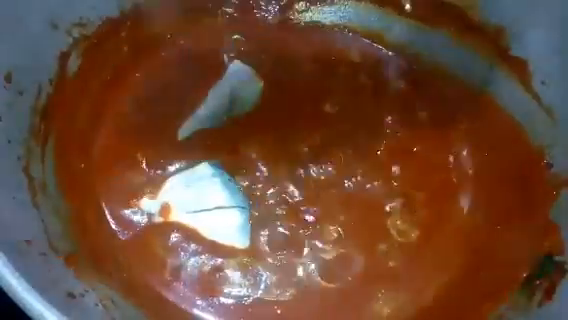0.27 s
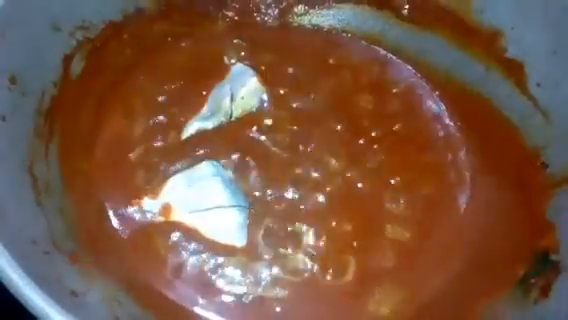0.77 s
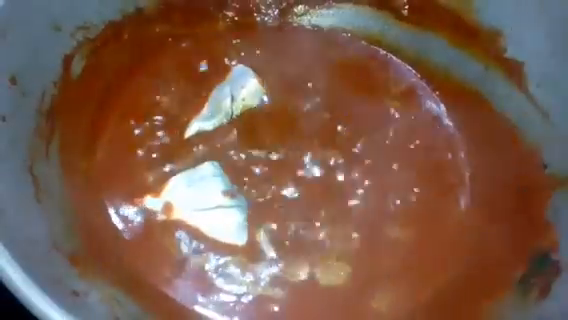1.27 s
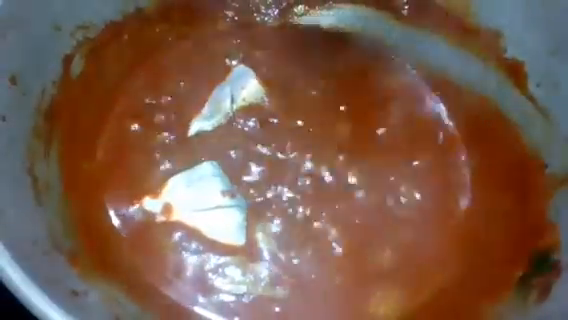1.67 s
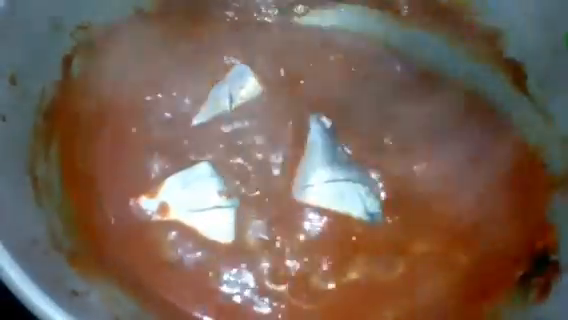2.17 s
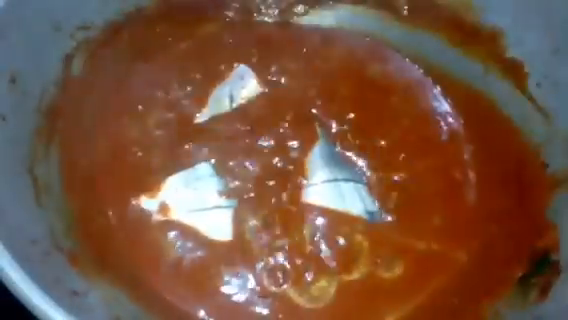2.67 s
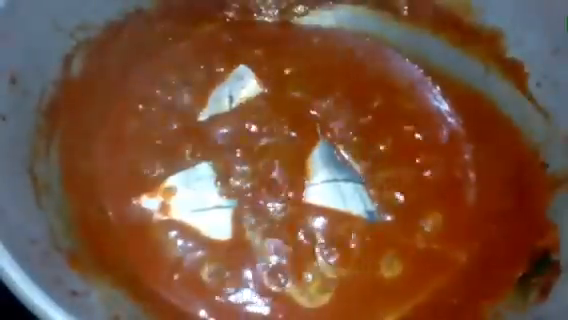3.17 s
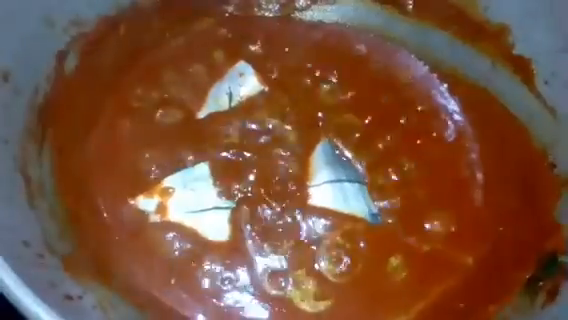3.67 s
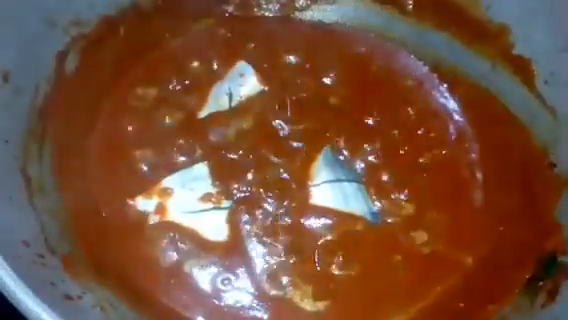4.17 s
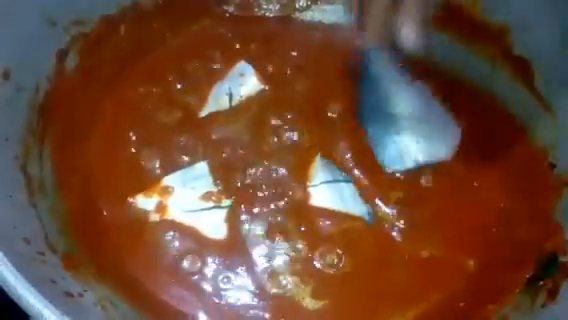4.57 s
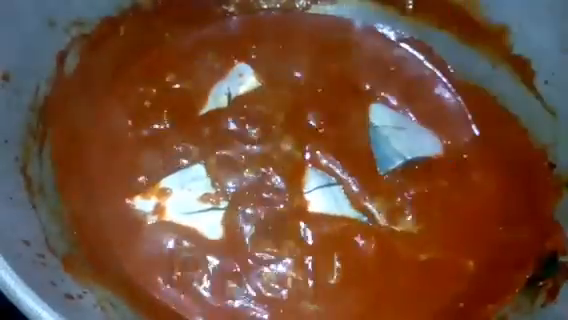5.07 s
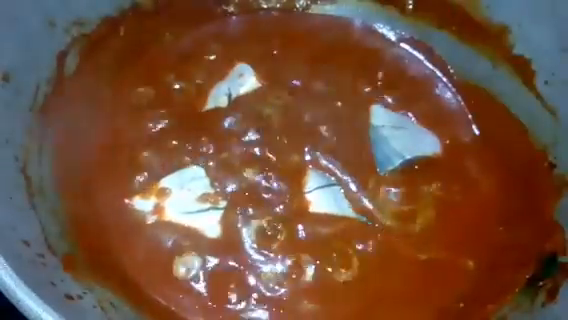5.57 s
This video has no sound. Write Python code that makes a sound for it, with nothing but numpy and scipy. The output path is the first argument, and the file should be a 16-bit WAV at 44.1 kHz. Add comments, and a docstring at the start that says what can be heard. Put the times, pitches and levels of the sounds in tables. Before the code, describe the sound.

Thick gravy simmers in a metal pan, heard very close in a small kitchen. Uneven bubbles tick, pop and glug over a faint burner rush, with one sharp bright pop about a second in. Near the middle, something hollow like a bowl knocks down hard twice beside the stove, rattling briefly. Simmering continues, then a piece of fish slaps softly into the gravy with a gurgle.

```python
"""Thick gravy simmers in a metal pan in a small kitchen, close to the microphone: bubbles of every size
are sines that swell, climb in pitch and die as the film tears, with noise snaps and short reflections.
The pan booms softly as noise excites its resonances, over the noise rush of a burner.
Something hollow, perhaps a bowl, knocks down twice beside the stove (clicks into ringing modes, and clatter)
and is slid along (friction noise); then a piece of fish slaps into the gravy (noise and a spray of bubbles)."""
import sys
import numpy as np
from scipy import signal
from scipy.fft import rfft, irfft
from scipy.io import wavfile
from scipy.ndimage import uniform_filter1d

SR = 44100
rng = np.random.default_rng(int(sys.argv[2]) if len(sys.argv) > 2 else 0)


def persist_wave(psi):
    """Save psi, clipped to +-1, as 16-bit WAV."""
    counts = np.round(np.clip(psi, -1, 1) * 32767).astype(np.int16)
    wavfile.write(sys.argv[1], SR, np.atleast_2d(counts).T)


N = 257103
TIME = np.arange(N) / SR
PORT_LAG_S = 0.00025   # extra travel time to the left microphone port

# level difference between the ports for the pan at large: frequency_hz, left_right_db
SHADE = [(150, -2), (400, -0.5), (700, 1), (1700, -1.5), (3100, -4), (5500, -10.5), (9000, -22),
         (13000, -76)]
# the same for sounds from the right, mostly weaker at the left port: frequency_hz, left_right_db
RIGHT_SHADE = [(150, -9), (330, 1.5), (500, -4), (770, -7), (1170, -9), (1800, -1), (2750, -5.5),
               (4200, -4.5), (6400, -10), (9800, -26), (15000, -33)]
# the simmer; its burble is strongest near 1.85 s, then slowly calms: time_s, fizz_db, burble_db
SIMMER = [(0, -65.5, -63), (1.1, -67.5, -64), (1.85, -64.5, -60.5), (2.6, -66.5, -63), (4.2, -66.5, -65),
          (5.83, -66.5, -67.5)]
# relative loudness of tiny bubbles by size: pitch_hz, level_db
FIZZ = [(1900, -21), (3200, 1.5), (4500, 6.5), (6200, 5.5), (7400, -38)]
# relative loudness of soft larger bubbles by size: pitch_hz, level_db
BURBLE = [(300, -8.5), (530, 4.5), (750, 3), (1200, 6), (2400, 0.5)]
# big bubbles opening: onset_s, level_db, pitch_hz, left_right_db
GLUGS = [(0.135, -34, 658, -0.5), (0.399, -48.5, 493, 1), (0.653, -44, 500, 5), (0.845, -48, 537, 10),
         (1.085, -47.5, 356, 1), (1.164, -45.5, 273, 0), (1.394, -45.5, 343, 2), (1.456, -45, 510, 3),
         (1.539, -50, 507, 3), (1.637, -51.5, 485, 0), (1.684, -52, 537, 2), (1.812, -45.5, 694, 1),
         (1.871, -44.5, 660, 1), (2.056, -45, 268, 0), (2.281, -46.5, 573, -3), (2.627, -43.5, 800, -0.5),
         (2.763, -35.5, 556, -2), (3.403, -45, 524, -3), (3.644, -51, 516, 2), (4.004, -42.5, 620, -3),
         (4.16, -42.5, 590, 4), (4.283, -49.5, 340, -1), (4.857, -32.5, 640, -7), (5.294, -40.5, 580, -3),
         (5.525, -49, 245, 2), (5.751, -46.5, 301, -1)]
# contacts of the hollow thing: start_s, thud_db, clatter_db, treble_tilt_db
KNOCKS = [(2.8203, -19, -28, -2), (2.8315, -34, -29, -2), (2.8436, -33, -28.5, -11.5),
          (2.8500, -52, -31, -4), (2.8700, -30, -29, -11), (2.8815, -40, -42, -7), (2.910, -38, -48, -13),
          (3.1868, -22, -34.5, 0), (3.1990, -44, -31, -10), (3.2057, -29, -31.5, -6.5),
          (3.2117, -34.5, -30, -12.5), (3.237, -32, -40, -1)]
# modes of the hollow thing: frequency_hz, level_db, t60_s
HOLLOW = [(245, -20.5, 0.5), (285.5, -16.5, 0.29), (355, -5, 0.16), (371.7, -6, 0.14), (451.7, -5.5, 0.32),
          (491, -20, 0.28), (528.8, -4, 0.31), (587, -13.5, 0.24), (689, -22, 0.27), (731, -19, 0.25),
          (758, -22.5, 0.2), (1020, -18.5, 0.32), (1150, -19.5, 0.29), (1580, -38, 0.24),
          (2530, -26, 0.062), (2600, -12, 0.24), (2880, -23, 0.17), (3070, -7, 0.13), (3120, -6.5, 0.085),
          (3270, -7.5, 0.08)]
# colour of its clatter and friction: frequency_hz, gain_db
CLATTER = [(30, -40), (90, -29), (150, -26), (260, -16), (380, -5), (520, -2), (680, -7), (1300, -7.5),
           (2200, -4.5), (3050, 1.5), (3800, -6), (5800, -6.5), (8000, -18), (14000, -34)]
# soft slides on the counter, bell-shaped in time: peak_s, level_db, half_length_s
SLIDES = [(2.814, -39, 0.021), (3.03, -54, 0.017), (3.178, -54, 0.0079), (3.44, -55.5, 0.022),
          (3.529, -53.5, 0.021), (3.707, -43.5, 0.034)]
# fish meeting gravy: start_s, level_db, rise_s, t60_s
SLAPS = [(4.93, -40.5, 0.0032, 0.14), (4.939, -32.5, 0.0024, 0.17), (4.959, -41, 0.024, 0.27),
         (5.05, -61, 0.0064, 0.21)]


def from_db(db):
    """Level as a logarithm: decibels to amplitude gain."""
    return 10 ** (np.asarray(db) / 20)


def rms_one(x):
    """Mean power: scale a signal to an rms of 1."""
    return x / np.sqrt(np.mean(x ** 2) + 1e-20)


def in_time(rows):
    """Slow variation: each column of a table, interpolated at every sample."""
    s, *columns = np.transpose(rows)
    return [np.interp(TIME, s, c) for c in columns]


def at_hz(points, hz):
    """Spectral curve: read a table on a log-frequency axis."""
    table_hz, values = np.array(points).T
    return np.interp(np.log(np.maximum(hz, 1)), np.log(table_hz), values)


def add(out, s, sound):
    """Superposition: mix a sound in from time s."""
    start = max(0, int(s * SR))
    part = sound[..., :max(0, N - start)]
    out[..., start:start + part.shape[-1]] += part


def dying(t, t60):
    """Exponential decay: the amplitude falls 60 dB in t60 seconds."""
    return np.exp(-np.log(1000) * t / max(t60, 1e-3))


def swells(rows):
    """Gaussian envelopes: bell-shaped rises and falls of strength, half being the standard deviation."""
    out = np.zeros(N)
    for s, db, half in rows:
        near = slice(*np.searchsorted(TIME, [s - 5 * half, s + 5 * half]))
        out[near] += from_db(db) * np.exp(-.5 * ((TIME[near] - s) / half) ** 2)
    return out


def lumpy(size, per_s, depth_db):
    """Random amplitude modulation: an uneven gain of rms 1, steady once its 2000 knots run out."""
    knots = rng.standard_normal(2000)
    return rms_one(from_db(depth_db * np.interp(TIME[:size] * per_s, np.arange(len(knots)), knots)))


def high_pass(x, hz):
    """Radiation efficiency: small sources radiate little bass."""
    return signal.sosfilt(signal.butter(3, hz, "high", fs=SR, output="sos"), x)


def ring(drive, hz, t60):
    """Damped resonator: a unit click sets a sine of about unit height ringing."""
    r, w = dying(1 / SR, t60), 2 * np.pi * hz / SR
    return signal.lfilter([0, np.sin(w)], [1, -2 * r * np.cos(w), r * r], drive + 1e-18)


def diffuse(colour, size, tilt_db=0, shade=SHADE):
    """Diffuse field: coloured noise from all sides, less alike at the two ports as frequency rises; rms 1."""
    # likeness of the two ports: frequency_hz, correlation
    likeness = [(50, 0.7), (150, 0.86), (420, 0.6), (850, 0.3), (1700, 0.02), (4000, 0)]
    hz = np.arange(size // 2 + 1) * SR / size
    mid, side = rfft(rng.standard_normal((2, size)))
    alike = np.clip(at_hz(likeness, hz), -1, 1)
    both = np.sqrt(1 + alike) * mid + np.sqrt(1 - alike) * side * [[1], [-1]]
    both[0] *= from_db(at_hz(shade, hz))
    gain_db = at_hz(colour, hz) + tilt_db * np.log2(1 + hz / 1000)
    return rms_one(irfft(both * from_db(gain_db), size))


def bubble(hz, pan_db, cycles, rise, rough, wall_db):
    """Cavity resonance: as the film tears, the note swells, climbs as the hole widens, and dies."""
    t = np.arange(int((7 * cycles / hz + .003) * SR)) / SR
    age = t * hz / cycles - 3   # in swell times, zero at the loudest moment
    phase = 2 * np.pi * np.cumsum(hz * (1 + rise * np.tanh(age / 2))) / SR
    tear = np.interp(t * hz, np.arange(200), rng.standard_normal(200))   # the ragged edge jolts the note
    note = (np.sin(phase) + rough * tear * np.cos(phase)) / np.cosh(2 * np.minimum(age, 20))
    note /= np.max(np.abs(note))
    # the pan's wall throws each burst back, by another path to each port
    detours = rng.uniform(.0012, .0026) + rng.uniform(0, .0005, 2)
    lags = [PORT_LAG_S * rng.uniform(0.23, 1.505), 0]
    heard = []
    for lag, detour in zip(lags, detours):
        direct = np.interp(t - lag, t, note)
        echo = np.interp(t - lag - detour, t, note)
        heard.append(direct + from_db(wall_db) * echo)
    right = 2 / (1 + from_db(pan_db))
    return np.array(heard) * [[2 - right], [right]]


def bursts(rows, cycles, rise, rough, wall_db=-5.5):
    """Transient onset: each listed bubble has a rounded swell, cycles / pitch being its swell time."""
    out = np.zeros((2, N))
    swell_cycles = np.maximum(cycles, .5) * np.ones(len(rows))
    for (s, level_db, hz, pan_db), swell in zip(rows, swell_cycles):
        # start early, so the rounded swell peaks one swell time after the onset
        add(out, s - 2 * swell / hz, from_db(level_db) * bubble(hz, pan_db, swell, rise, rough, wall_db))
    return out


def swarm(sizes, per_s, spread_db, cycles, rise, rough, clump_db=0):
    """Random point process: countless lesser bubbles of random size and place, in clumps; rms 1."""
    low, high = sizes[0][0], sizes[-1][0]
    busy = np.cumsum(lumpy(N, per_s=28, depth_db=clump_db))
    turn, size, force, place, length = rng.random((int(per_s * N / SR), 5)).T
    onset_s = np.interp(turn, busy / busy[-1], TIME)
    hz = low * (high / low) ** size
    level_db = at_hz(sizes, hz) + spread_db * np.minimum(-np.log(1 - force), 3)
    pan_db = at_hz(SHADE, hz) + 8 * (place - .5)
    rows = np.transpose([onset_s, level_db, hz, pan_db])
    return rms_one(bursts(rows, cycles * (.5 + length), rise, rough))


def kitchen(x, wet_db, t60, first_s):
    """Reverberation: close walls and hob return a short dense wash, built up around first_s."""
    # colour of the reflections: frequency_hz, gain_db
    room_colour = [(100, 24), (400, -2.5), (700, 12.5), (1200, 4), (3000, 6.5), (7000, 0), (15000, 2.5)]
    t = TIME[:SR // 2]
    response = diffuse(room_colour, len(t)) * dying(t, t60) * np.clip(t / first_s - .5, 0, 1)
    response /= np.sqrt(np.sum(response[1] ** 2))
    return x + from_db(wet_db) * signal.fftconvolve(x[1:], response, axes=1)[:, :N]


def flame():
    """Turbulence noise: the burner's soft rush is steady coloured noise."""
    # colour of the burner: frequency_hz, gain_db
    flame_colour = [(20, -12.5), (50, -5), (80, -1), (350, -8.5), (550, -17), (1000, -19.5), (2000, -22.5),
                    (5000, -20), (6800, -21), (8200, -34.5), (15000, -36.5)]
    return from_db(-62.0) * diffuse(flame_colour, N)


def whistle():
    """Narrow-band resonance: steam sings thinly through a pinhole for a moment."""
    note = rms_one(ring(rng.standard_normal(N), hz=947, t60=0.78))
    return swells([(1.57, -66, 0.1)]) * note


def slides():
    """Friction excitation: fine noise swells with each push and stirs the hollow body's modes."""
    friction = diffuse(CLATTER, N, tilt_db=-3.5, shade=RIGHT_SHADE) * lumpy(N, per_s=230, depth_db=1.5)
    body = rms_one(sum(ring(friction, hz, t60) for hz, _, t60 in HOLLOW))
    return swells(SLIDES) * (from_db(-6.5) * friction + from_db(-8.0) * body)


def knocks():
    """Impact excitation: each contact cracks, rings the hollow body's modes and rattles the same clatter."""
    # the rim rasps as it settles after each knock: peak_s, level_db, half_length_s
    rasp_rows = [(2.852, -37.5, 0.022), (3.212, -40.5, 0.022)]
    # colour of the rasp: frequency_hz, gain_db
    rasp_colour = [(500, 1), (2500, -3.5), (5500, 1), (8000, -7), (14000, -16.5)]
    out, blows, t = np.zeros((2, N)), np.zeros(N), TIME[:SR // 2]
    fade = dying(t, 0.26) + from_db(-47) * dying(t, 0.7)
    clatter = rfft(diffuse(CLATTER, len(t), shade=RIGHT_SHADE) * fade)
    clatter_hz = np.arange(clatter.shape[1]) * SR / len(t)
    octaves = np.log2(1 + clatter_hz / 1000) - 1   # the tilt pivots at 1 kHz
    ending = 1 - (t / t[-1]) ** 2
    for s, thud_db, clatter_db, tilt_db in KNOCKS:
        add(blows, s, from_db([thud_db]))
        crack = from_db(2.5) * diffuse(CLATTER, len(t), tilt_db, RIGHT_SHADE) * dying(t, .03)
        rattle = lumpy(len(t), per_s=260, depth_db=4.2)
        tail = ending * rattle * irfft(clatter * from_db(tilt_db * octaves), len(t))
        add(out, s, from_db(clatter_db) * (crack + tail))
    blunt = signal.butter(2, 5000, fs=SR, output="sos")   # a blunt contact excites less treble
    blows = signal.sosfilt(blunt, high_pass(blows, hz=210))
    for k, (hz, level_db, t60) in enumerate(HOLLOW):
        mode = (-1) ** k * from_db(level_db) * ring(blows, hz, t60)   # neighbouring modes move in opposition
        left = from_db(at_hz(RIGHT_SHADE, hz)) * np.interp(TIME - PORT_LAG_S, TIME, mode)
        out += [left, mode]
    rasp = diffuse(rasp_colour, N, shade=RIGHT_SHADE) * lumpy(N, per_s=780, depth_db=3.5)
    return out + swells(rasp_rows) * rasp


def fish():
    """Liquid impact: a flat wet slap throws up a spray of tiny bubbles and droplets."""
    # colour of the slap: frequency_hz, gain_db
    splash_colour = [(60, -3), (230, -12), (360, 6.5), (445, 11), (560, 2), (640, -12), (750, 2), (900, -6),
                     (1120, 6), (1300, -7), (1460, 11), (1800, -7), (2150, 0), (2550, -6.5), (3300, -9),
                     (3700, -7), (4300, -17.5), (5350, -14), (6800, -21), (8000, -31), (15000, -45)]
    t = TIME[:SR // 2]
    spray = swarm(BURBLE[1:], per_s=570, spread_db=2.0, cycles=1.856, rise=0.1, rough=1.0)
    droplets = swarm(FIZZ, per_s=900, spread_db=3.0, cycles=1.3, rise=.12, rough=.8)
    force = np.zeros(N)
    for s, level_db, rise_s, t60 in SLAPS:
        add(force, s, from_db(level_db) * (1 - np.exp(-(t / rise_s) ** 2)) * dying(t, t60))
    smack = diffuse(splash_colour, N, shade=RIGHT_SHADE) * lumpy(N, per_s=300, depth_db=2.0)
    return force * (from_db(1.6) * smack + from_db(-8.5) * spray + from_db(-30) * droplets)


def pan_boom():
    """Forced resonance: the pan's low modes murmur and swell with each glug, knock, slide and slap."""
    # hollow resonances of the pan: frequency_hz, width_hz, level_db
    pan_modes = [(111, 14, -12), (147.6, 10, -3.5), (187.6, 6.1, -3), (251.6, 27, -7.5), (287, 4.3, -15.5),
                 (351.8, 4.3, -10.5)]
    murmur_db = -63.5   # under the simmer alone
    rise_s, t60_s, delay_s = 0.018, 0.68, 0.0098   # every push on the pan swells and dies alike
    # how strongly each kind of event shakes the pan, in dB relative to its own level
    shakers = [(KNOCKS, -23.5), (SLIDES, -10.5), (SLAPS, -22), (GLUGS, -25)]
    power = from_db(murmur_db) ** 2
    for rows, shake_db in shakers:
        for s, db, *_ in rows:
            since = TIME - s - delay_s
            rising = np.exp(-.5 * (np.minimum(since, 0) / rise_s) ** 2)
            falling = dying(np.maximum(since - rise_s, 0), t60_s)
            power = power + (from_db(db + shake_db) * rising * falling) ** 2
    push = high_pass(rng.standard_normal(N), hz=106)
    boom = np.zeros(N)
    for hz, width, db in pan_modes:
        mode_t60 = np.log(1000) / (np.pi * width)   # a narrower resonance rings longer
        boom += from_db(db) * rms_one(ring(push, hz, mode_t60))
    boom = rms_one(boom)
    local_power = uniform_filter1d(boom ** 2, size=SR // 14)   # levelled, so the envelope alone sets loudness
    return boom * np.sqrt(power / local_power) * from_db([[-1.5], [0]])


def low_surges():
    """Frequency modulation: each surge swells a low note that wavers at random."""
    # low surges near 149 Hz, strongest around the knocks: peak_s, level_db, half_length_s
    surge_rows = [(0.01, -54.5, 0.014), (.17, -63.5, 0.022), (1.407, -60, 0.011), (1.686, -60, 0.012),
                  (2.11, -61, 0.051), (2.29, -60, 0.032), (2.68, -53, 0.011), (2.775, -42, 0.029),
                  (2.87, -42.5, .028), (2.99, -41.5, 0.017), (3.06, -44.5, 0.016), (3.24, -53.5, 0.045),
                  (3.51, -55, 0.029), (3.75, -54.5, 0.032), (4.2, -53.5, 0.032), (4.297, -61, 0.011),
                  (4.82, -54, 0.04), (4.985, -48.5, 0.019), (5.09, -53.5, 0.023), (5.29, -56.5, 0.021),
                  (5.388, -56.5, 0.0083), (5.47, -53, 0.017), (5.523, -51.5, 0.0089), (5.76, -55.5, 0.04)]
    note_hz, waver = 149, 0.0255   # the waver is a share of the pitch
    knots = np.arange(0, N / SR + 1, .04)
    hz = note_hz * (1 + waver * np.interp(TIME, knots, rng.standard_normal(len(knots))))
    note = rms_one(np.sin(2 * np.pi * np.cumsum(hz) / SR))
    flutter = lumpy(N, per_s=50, depth_db=1.8)
    return swells(surge_rows) * flutter * note * from_db([[-.7], [.5]])


def fine_fizz():
    """Superposed cavity notes: tiny bubbles fizz, and flare up as a raft of them breaks."""
    # rafts breaking: peak_s, level_db, half_length_s
    sizzle_rows = [(.68, -61, 0.025), (1.05, -51, 0.018), (1.108, -57.5, 0.031), (1.288, -57, 0.0095),
                   (4.36, -54, 0.015), (5.12, -67, 0.011), (5.59, -57.5, 0.016)]
    fizz_db, _ = in_time(SIMMER)
    steady = swarm(FIZZ, per_s=380, spread_db=3.5, cycles=1.4, rise=0.082, rough=0.61, clump_db=4.5)
    sizzle = swarm(FIZZ, per_s=810, spread_db=3.5, cycles=1.9, rise=0.028, rough=1.0)
    return from_db(fizz_db) * steady + swells(sizzle_rows) * sizzle


def ticking():
    """Impulsive rupture: thin films snap all over the surface, following the fizz 5 dB below it."""
    # relative loudness of the ticks by size: pitch_hz, level_db
    tick_sizes = [(900, 0), (1800, -4), (3200, 1), (5200, 1)]
    fizz_db, _ = in_time(SIMMER)
    ticks = swarm(tick_sizes, per_s=70, spread_db=4.0, cycles=0.884, rise=0.092, rough=0.7)
    return from_db(fizz_db - 5) * ticks


def foam():
    """Collective collapse: patches of foam crackle as many small bubbles burst together."""
    # collapsing patches: peak_s, level_db, half_length_s
    foam_rows = [(.15, -55, 0.009), (.21, -57.5, 0.021), (.378, -58, 0.011), (1.399, -54.5, 0.014),
                 (1.49, -51, 0.0048), (1.878, -42, 0.0043), (2.10, -54.5, 0.027), (2.452, -53.5, 0.015),
                 (3.52, -47.5, 0.011), (4.291, -49, 0.0096), (5.579, -61, 0.025)]
    # relative loudness of the foam's bubbles by size: pitch_hz, level_db
    crackle_sizes = [(2200, -12.5), (4000, -0.5), (6500, 1), (8500, -14), (14000, -10)]
    crackle = swarm(crackle_sizes, per_s=850, spread_db=2.2, cycles=2.2, rise=0.15, rough=0.8)
    return swells(foam_rows) * crackle


def burble():
    """Cavity notes scale with size: larger soft bubbles burble lower, and well up in clusters."""
    # clusters welling up: peak_s, level_db
    gurgle_rows = [(.655, -59.5), (.79, -61.5), (2.651, -62.5), (3.43, -57), (4.033, -59.5), (4.885, -49),
                   (4.99, -50), (5.07, -59), (5.77, -65)]
    gurgle_half_s = 0.022
    _, burble_db = in_time(SIMMER)
    welling = from_db(burble_db) + swells([(s, db, gurgle_half_s) for s, db in gurgle_rows])
    soft = swarm(BURBLE, per_s=290, spread_db=2.3, cycles=1.278, rise=0.063, rough=0.98, clump_db=2.5)
    return high_pass(welling * soft, hz=174)


def spits():
    """Rapid vaporisation: droplets spit on hot metal with a high note and a dry crack."""
    # spitting droplets: onset_s, level_db, pitch_hz, left_right_db
    spit_rows = [(0.077, -55, 9000, -18), (0.167, -48.5, 8800, -22), (0.379, -38.5, 8900, -32),
                 (0.9064, -49.5, 11600, -22), (1.287, -54, 10000, -22), (1.3248, -36, 9700, -23.5),
                 (1.393, -52, 9100, -21), (1.542, -54, 8850, -22), (1.8775, -33.5, 10860, -36),
                 (2.097, -38, 7140, -23), (2.4322, -38.5, 9000, -12), (2.791, -48, 8500, -15),
                 (3.3748, -48, 8200, -13), (3.518, -43, 7600, -27), (4.288, -43, 6500, -20),
                 (4.293, -52, 13900, -15), (4.514, -53, 10100, -20), (5.242, -48.5, 9370, -27),
                 (5.418, -37, 6850, -23), (5.5633, -46.5, 7760, -28)]
    swell_cycles, copy_gap_s, copy_db = 4.7, 0.005, -19.5
    copies = []   # fainter copies placed around each spit soften its onset
    for s, db, hz, pan_db in spit_rows:
        for k in (-1, 1, 2):
            onset_s = s + k * copy_gap_s * rng.uniform(0.75, 1)
            copies.append((onset_s, db + copy_db, hz * rng.uniform(1.0, 1.1), pan_db))
    # the crack falls on the spit's loudest moment
    cracks = swells([(s + swell_cycles / hz, db - 10, 0.0011) for s, db, hz, _ in spit_rows])
    noise = diffuse([(2000, -14), (8000, -2), (15000, 0)], N, shade=RIGHT_SHADE)
    return cracks * noise + bursts(spit_rows + copies, swell_cycles, rise=.28, rough=0.6)


def plips():
    """Damped cavity resonance: middling bubbles open with a soft wet plip."""
    # middling bubbles: onset_s, level_db, pitch_hz, left_right_db
    plip_rows = [(0.4192, -46, 1740, -1), (0.8861, -48, 1150, 5), (1.6856, -45, 1150, -9),
                 (1.721, -41.5, 1180, -4.5), (2.136, -46, 1460, 8), (2.515, -43.5, 1560, -4),
                 (3.4513, -45, 1540, -12), (3.53, -45, 1070, -4), (3.799, -45, 1520, -2),
                 (4.081, -43.5, 1290, 0), (4.258, -46, 1170, -3.5), (4.4697, -48, 1210, -1.5),
                 (4.619, -48.5, 1140, -1), (5.062, -49, 1440, -2)]
    return bursts(plip_rows, cycles=2.22, rise=0.038, rough=0.62)


def pops():
    """Film rupture: a small bubble rings, from dry tick to long pop, and its tear adds a broad snap."""
    # small bubbles: onset_s, level_db, pitch_hz, left_right_db, swell_cycles
    pop_rows = [(0.069, -39, 3600, -11, 2), (0.1486, -29.5, 4800, -12, 5.8), (0.168, -36, 4080, -17, 2.7),
                (0.379, -34, 2880, -5, 4.5), (0.3984, -37, 3370, -22, 2), (0.623, -40, 1260, 1, 3.3),
                (0.694, -49, 3400, -9, 2), (0.741, -38.5, 2070, -6, 1.02), (0.801, -46, 4000, -9, 2.1),
                (1.0297, -22.5, 5400, -40, 4.8), (1.0307, -19.5, 4650, -11, 3.65),
                (1.082, -37.5, 3840, -19, 3.1), (1.087, -31, 2520, -9, 3.6), (1.1527, -36, 3100, -23, 2),
                (1.3187, -34.5, 1920, -30, 5.1), (1.3598, -37.5, 3680, -5, 2.3),
                (1.4773, -44, 4430, -25, 3.4), (1.6939, -35, 3710, -16, 3.04), (1.844, -41, 4400, -11, 2),
                (2.058, -32, 2150, -3, 1.6), (2.2839, -33, 2400, -6, 2.43), (2.4525, -40.5, 2300, 1, 2.4),
                (2.5147, -34, 4900, -1, 2.14), (2.744, -36.5, 5540, -6, 2), (2.976, -38.5, 4500, 0, 4),
                (3.053, -39, 4500, -10, 1.9), (3.5051, -33.5, 1840, -14, 2.52),
                (4.0063, -40.5, 3500, -4, 1.8), (4.051, -45, 3200, -8, 1.1), (4.274, -41, 4040, -10, 2.6),
                (4.29, -30.5, 5100, -10, 2.2), (4.5687, -35, 1265, -3.5, 4), (4.5699, -33, 1790, -4.5, 4.4),
                (4.8716, -28, 1800, -11, 4.3), (5.103, -44, 4200, -10, 3.5), (5.119, -41.5, 4280, -7, 2),
                (5.134, -46, 4100, -6, 2.8), (5.3045, -45.5, 3600, -5, 2), (5.4188, -26.5, 4480, -5, 3.24),
                (5.556, -41, 3000, -11, 2), (5.7493, -45, 3000, -4, 1.3), (5.7865, -35.5, 2010, -13, 2.6),
                (5.8077, -41, 2720, -7, 2.6)]
    # colour of a tearing film: frequency_hz, gain_db
    snap_colour = [(100, -10), (500, 0), (2000, 4), (3500, 4.5), (5000, 2), (7000, -13), (9000, -27),
                   (15000, -44)]
    snap_half_s = 0.00038   # how long a film takes to tear
    swell_cycles = [row[-1] for row in pop_rows]
    notes = bursts([row[:4] for row in pop_rows], swell_cycles, rise=0.11, rough=0.62, wall_db=-7.0)
    snap_rows = []
    for s, db, hz, _, cycles in pop_rows:
        snap_db = db - 3.5 - 4 * cycles   # the longer a bubble rings, the less it snaps
        snap_rows.append((s + cycles / hz, snap_db, snap_half_s))
    return notes + swells(snap_rows) * diffuse(snap_colour, N)


def glugs():
    """Low cavity resonance: a big bubble glugs, closes, and gulps again a little lower and further right."""
    regulps = [(s + 0.0079, db - 10.5, hz * 0.935, pan_db - 6) for s, db, hz, pan_db in GLUGS]
    return high_pass(bursts(GLUGS + regulps, cycles=1.375, rise=0.08, rough=0.54), hz=200)


def gravy():
    """Superposition in a room: all the bubbles sound together, each group with its own reflections."""
    return (kitchen(fine_fizz() + burble(), wet_db=-6.0, t60=0.077, first_s=0.00073)
            + kitchen(spits() + foam(), wet_db=-5.0, t60=0.17, first_s=0.0024)
            + kitchen(pops() + plips() + ticking(), wet_db=-7.0, t60=0.14, first_s=0.0029)
            + kitchen(glugs(), wet_db=-5.5, t60=0.18, first_s=0.0054))


def scene():
    """Linear superposition: the burner, the things around the pan, the pan and its gravy."""
    return flame() + whistle() + slides() + knocks() + fish() + pan_boom() + low_surges() + gravy()


def record(dry):
    """Band limiting: faint microphone hiss that droops in the treble is added, and the top is cut."""
    droop = signal.butter(1, 13000, fs=SR, output="sos")
    hiss = from_db(-73.5) * signal.sosfilt(droop, rng.standard_normal((2, N)))
    top_cut = signal.ellip(10, .1, 80, 15750, fs=SR, output="sos")
    return signal.sosfilt(top_cut, dry + hiss)


dry = scene()
out = record(dry)
persist_wave(out)
```